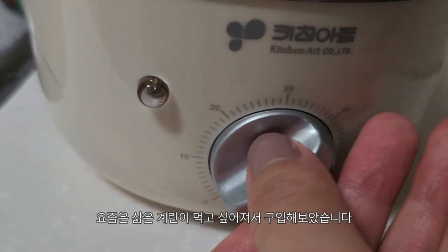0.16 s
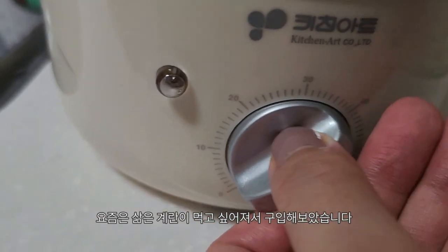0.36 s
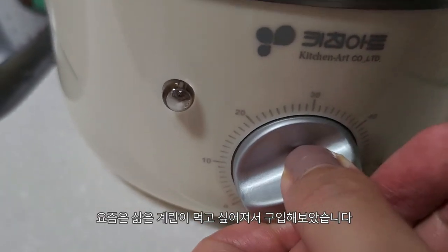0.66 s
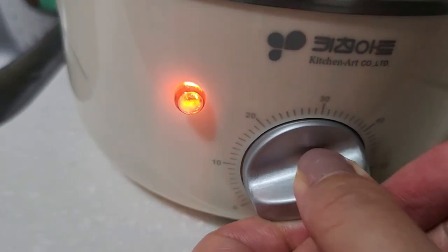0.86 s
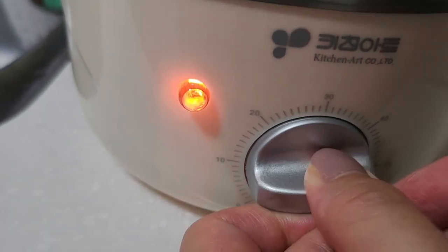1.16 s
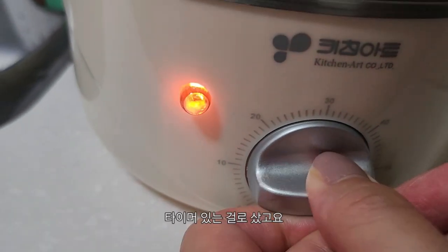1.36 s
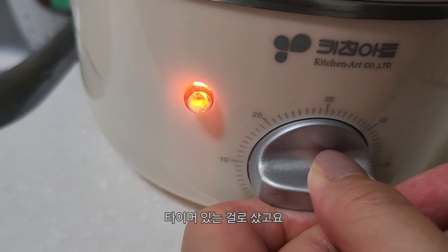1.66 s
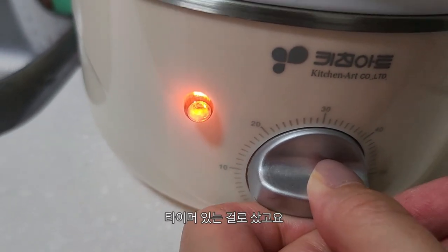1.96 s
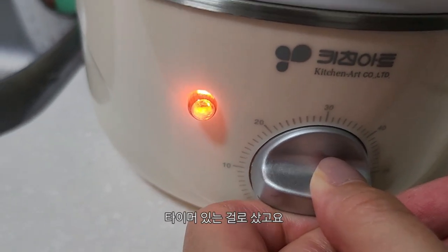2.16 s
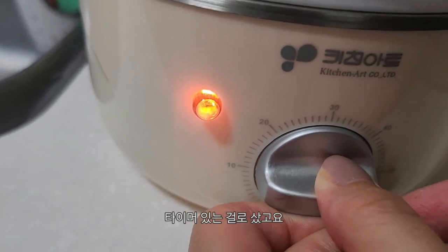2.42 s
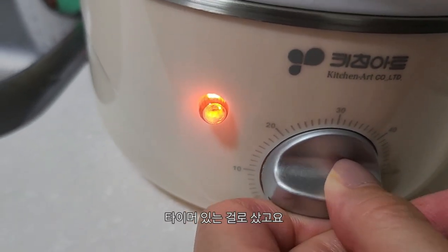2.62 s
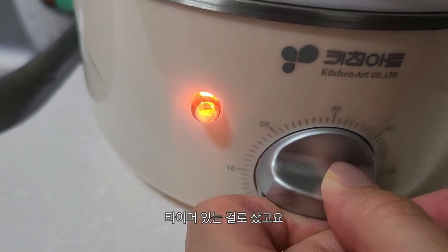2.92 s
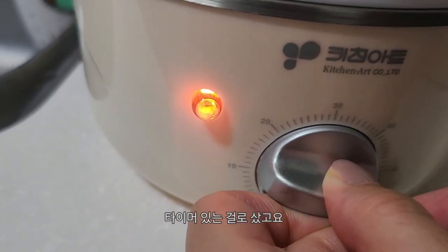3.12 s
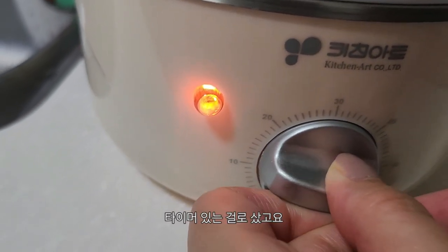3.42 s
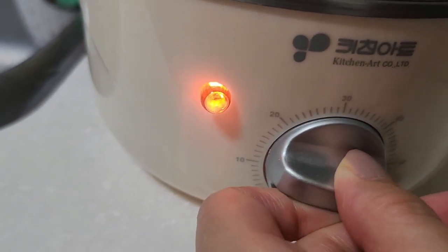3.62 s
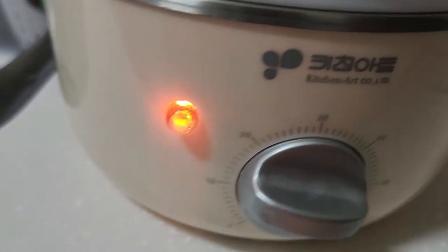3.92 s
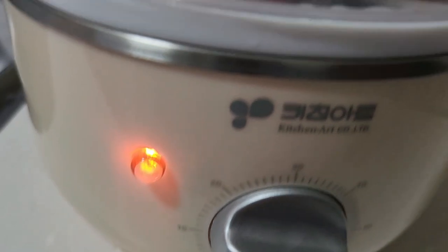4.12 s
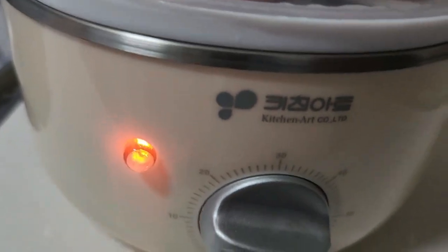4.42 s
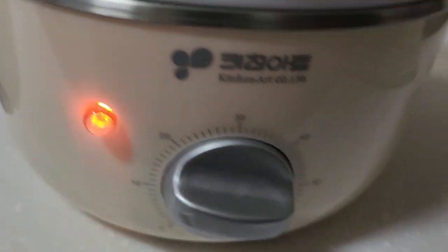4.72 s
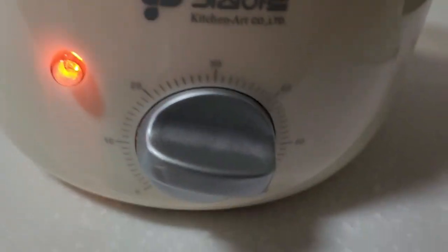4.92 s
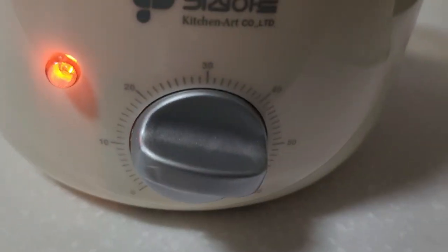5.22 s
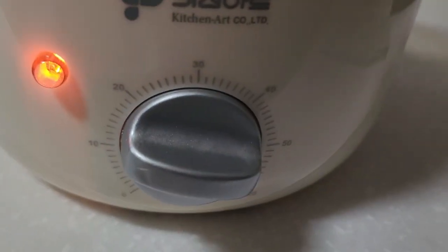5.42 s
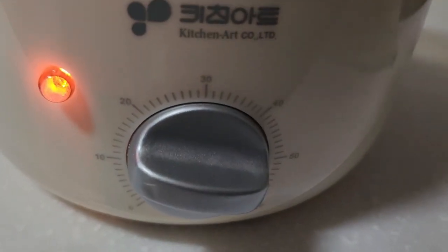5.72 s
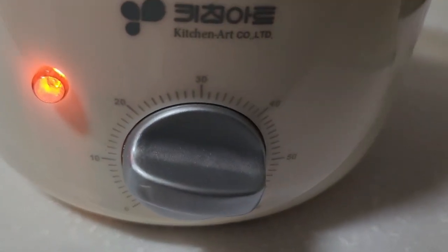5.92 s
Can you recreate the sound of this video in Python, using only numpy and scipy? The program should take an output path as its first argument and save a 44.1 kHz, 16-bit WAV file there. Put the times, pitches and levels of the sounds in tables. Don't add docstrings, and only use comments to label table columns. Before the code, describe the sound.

A handheld stereo microphone sits very near a spring timer. After faint skin brushing and a tiny squeak, the ratchet snaps rapidly, bright and metallic with a boxy boom from the hollow plastic shell. Smaller groups of clicks follow between quiet gaps. Then thin, regular ticks continue alone over low fridge hum and soft hiss, with a rub on the left side, small squeaks and dull handling bumps.

```python
import sys
import numpy as np
from scipy import signal
from scipy.io import wavfile

SR = 44100
rng = np.random.default_rng(int(sys.argv[2]) if len(sys.argv) > 2 else 0)


def dump(signal):
    limited = np.clip(np.atleast_2d(signal).T, -1, 1)
    pcm = np.round(limited * 32767).astype(np.int16)
    wavfile.write(sys.argv[1], SR, pcm)


def makeup_ratio(level_db):
    decades = np.asarray(level_db, float) / 20
    return 10 ** decades


N = 267687

# pitch in Hz, level in dB.
HUM = [(59.2, -67.5), (118.4, -68.5), (236.9, -81.5), (376.8, -84), (473.7, -80.5), (538.3, -87.5)]
# pitch in Hz, width in Hz, level in dB.
FAN_TONES = [(466.7, 48, -7.5), (1884, 21, -1.5), (2080, 31, -5.5), (2880, 67, -6), (3396, 24, -2.5),
             (4394, 61, -5), (6890, 45, -10), (7480, 120, -15.5), (8020, 110, -17), (8720, 60, -14.5),
             (8900, 22, -21.5), (10410, 55, -20)]
# time in seconds, level in dB.
AIR = [(0, -62.5), (.6, -63.5), (2.2, -64), (3.3, -62.5), (3.7, -61), (4.4, -61.5), (5, -62), (5.6, -59),
       (6.07, -57.5)]
# pitch in Hz, left minus right in dB.
AIR_BALANCE = [(60, -5), (110, -4.5), (200, 0.5), (380, -10.5), (700, 3.5), (1290, 9), (2380, -11.5),
               (4400, -8), (8120, 0), (15000, 3)]
# pitch in Hz, likeness from 0 to 1.
LIKENESS = [(60, 0.67), (250, 0.83), (700, 0.082), (2000, 0.2), (6000, 0.067), (15000, 0.11)]
# pitch in Hz, level in dB per Hz.
RUMBLE = [(15, -53), (25, -16), (44, -11), (118, -3.5), (150, -10.5), (187, -11.5), (244, -11.5),
          (286, -23.5), (475, -27.5), (506, -21.5), (1100, -41), (1430, -70), (2420, -120)]
# pitch in Hz, level in dB per Hz.
HISS = [(1100, -54), (1500, -36), (1850, 1.5), (2600, -7), (3200, -19), (3900, -22.5), (4500, -10),
        (5500, -22.5), (7000, -15), (9000, -23), (10500, -20), (12500, -13.5), (14500, -17.5), (16500, -19)]
HISS_DB, HISS_RISE_DB_PER_S, HISS_FOLLOWS = -69, .5, -.3

# loudest moment in seconds, level in dB, swell in seconds,
# dull share in dB.
STROKES = [
    (.184, -71, 0.012, -11),
    (0.256, -72, .012, 9),
    (4.6, -65, 0.013, -10),
    (4.645, -63, 0.11, -11),
    (4.698, -46.5, 0.15, 0),
    (4.99, -62.5, 0.22, -4.5),
]
SWELL_DB, STROKE_FADE_DB_PER_S = 40.5, 602
# start in seconds, level in dB, start pitch in Hz, end pitch in Hz,
# length in seconds.
SQUEAKS = [
    (0.231, -45, 3150, 3000, 0.0092),
    (0.241, -46, 3040, 3010, 0.013),
    (3.824, -55, 2890, 2770, 0.023),
    (3.837, -55.5, 2230, 2130, 0.032),
    (4.888, -47.5, 2910, 2960, 0.011),
    (4.9, -52, 2610, 2600, 0.019),
]

# time in seconds, strength in dB, bright part in dB, dull part in dB.
TOUCHES = [(.441, -59, -20, 8.5), (.501, -49, -19, 0), (.5245, -36.5, -19, -5), (1.488, -36.5, -18, -8),
           (1.741, -38, -12, 5), (2.952, -47, -10, 4.5), (3.095, -46, -30, -5), (3.458, -38, -12, -19),
           (3.900, -50, -9, 2), (4.456, -47, -11, -8), (4.135, -52, -22, -10), (4.844, -54.5, 0, -12),
           (5.561, -45, -7, -8)]
# time in seconds, strength in dB, bright part in dB, dull part in dB.
TICKS = [(2.0587, -37, -22, -6.5), (2.3049, -28.5, -8.5, -3), (3.674, -42, -3, -5.5),
         (3.9415, -32, -16.5, -8), (4.2115, -33.5, -5.5, -9.5), (4.4838, -32.5, -14, -10.5),
         (4.7589, -30, -10, -12.5), (5.0319, -34.5, -13, -6), (5.3106, -31, -8, -14.5),
         (5.5835, -34.5, -11.5, -6), (5.8639, -29, -7, -9)]
# pitch in Hz, width in Hz, level in dB.
ESCAPEMENT = [(2120, 300, -3), (2600, 120, -24), (3570, 170, -15), (4080, 320, -2.5), (4860, 210, -5),
              (5400, 990, -31), (7800, 870, 3), (8630, 140, -4.5), (11400, 290, -3)]
# delay in seconds, level in dB.
TICK_CONTACTS = [(0, -2.5), (.0008, -3), (.0035, -5.5), (.006, -4)]

# time in seconds, strength
# in dB.
PAWL_DROPS = [(0.5338, -35), (0.5378, -24), (0.5439, -19), (0.6316, -20), (0.6795, -22.5), (0.6866, -25.5),
              (0.6959, -22.5), (0.7093, -21), (0.7199, -21), (0.7347, -21.5), (0.7453, -21), (0.7567, -24),
              (0.8139, -19.5), (0.8355, -20.5), (0.8512, -21.5), (0.8631, -21.5), (0.8731, -23),
              (0.8873, -21), (0.9174, -22.5), (0.9306, -22.5), (0.945, -19.5), (0.9644, -22), (0.98, -19),
              (0.9915, -20.5), (1.0043, -26), (1.0133, -20.5), (1.0572, -23), (1.0793, -21.5),
              (1.089, -20), (1.1439, -19.5),
              (1.3839, -23), (1.3951, -21.5), (1.4094, -19), (1.4287, -19), (1.5704, -21), (1.5883, -18.5),
          (1.6094, -21.5), (1.698, -20.5), (1.7536, -21.5), (1.7715, -22), (1.781, -20.5), (1.7942, -21.5),
          (1.8145, -21), (1.908, -23), (1.9317, -23), (1.9544, -23.5),
              (2.6602, -24), (2.733, -26), (2.7498, -23), (2.7655, -24), (2.798, -21), (2.8328, -20),
               (2.8692, -24.5), (2.8781, -22), (3.1099, -24), (3.3208, -24), (3.3335, -21), (3.3464, -21.5),
               (3.3583, -21.5), (3.4649, -27), (3.4704, -28.5), (3.4788, -29.5)]
# first tooth in seconds, last tooth in seconds,
# first level in dB, last level in dB.
SLIPS = [
    (1.0956, 1.1331, -17, -18),
    (2.8411, 2.858, -20.5, -23),
]
SLIP_GAP_S = .0045
SKIM_DB, TOOTH_SPREAD_DB = -4, 1.5
# time in seconds, bright part in dB,
# dull part in dB, shell boom in dB.
GRIP = [(.4, -7.5, -4.5, 7.5), (.59, -10, -7.5, -6), (.655, -4.5, -3, 7), (.785, -5, -6, 3.5),
        (.902, -5, -4.5, 4.5), (1.035, -7, -4, 2.5), (1.26, -8.5, -6, 4.5), (1.5, -9.5, -6.5, 0),
        (1.655, -12, -7, -2), (1.725, -7.5, -6, 5), (1.86, -7, -5, 0.5), (2.3, -10, -5, 0),
        (2.815, -6, -4, 7), (3.0, -8, -5, -4), (3.2, -9.5, -8, 3.5), (3.41, -11.5, -5, 8.5)]
# delay in seconds, level in dB.
SNAP_CONTACTS = [(-.0035, -19), (-.0016, -24), (0, -7), (.0006, 1.5), (.0012, 1), (.004, -21)]
# pitch in Hz, width in Hz, level in dB.
CRACK = [(2180, 1130, -16), (2600, 280, 0), (3670, 220, -2), (4363, 313, 3), (4710, 500, 3.5),
         (6560, 760, -39), (12300, 1100, -45.5)]
# pitch in Hz, width in Hz, level in dB.
MOVEMENT = [(645.5, 30, -16), (943, 45, -11), (1689, 71, -5.5), (1774, 113, -3), (2140, 200, 7.5),
            (2113, 83, 3.5), (2456, 180, -4.5), (2585, 30, -1.5), (2650, 150, -18), (3110, 23, -21),
            (3630, 60, -4), (3790, 70, 1), (4040, 39, -2), (4382, 63, 0), (4870, 59, -26), (5250, 77, -2),
            (5800, 130, -41), (7260, 270, 4.5)]
# pitch in Hz, width in Hz, level in dB.
HOUSING = [(244.6, 25, -1.5), (252.4, 14, -8.5), (410, 38, -10), (445, 32, -8.5)]
# pitch in Hz, level in dB per Hz.
RATTLE = [(180, -42), (300, -10.5), (447, -11.5), (528, -33.5), (961, -7.5), (1100, -31), (1610, -5),
          (2280, 4), (2520, -18), (3080, -2.5), (4370, -4.5), (5520, -3), (9880, -10.5), (12100, -4.5),
          (16000, -6.5)]
# pitch in Hz, time in seconds.
RATTLE_T60 = [(200, 0.23), (1000, 0.071), (4000, 0.051), (15000, 0.011)]
# pitch in Hz, time in seconds.
ROOM_T60 = [(200, 0.92), (1000, 0.19), (4000, 0.23), (15000, 0.065)]
# pitch in Hz, left minus right in dB.
SNAP_BALANCE = [(200, 0.5), (900, 9.5), (2050, 7), (2500, -9), (3400, -4.5), (4300, -5.5), (5400, 3),
                (9000, 2.5)]
# pitch in Hz, lead in radians.
SNAP_PHASE = [(600, 0), (1150, 2.4), (1450, 0), (2200, 0), (2800, 2.9), (4000, 1.7), (4400, -1),
              (7000, -1.4)]
RISE_S, CASE_RING_S = .004, .07
THIN_TICK_DB = -14

# time in seconds, level in dB, pitch in Hz.
BUMPS = [
    (3.831, -62, 106),
    (4.159, -50.5, 109),
    (4.655, -51, 68),
    (4.881, -54, 117),
    (5.004, -47.5, 130),
    (5.84, -52, 64),
    (6.004, -53, 80.5),
]


def rms_one(x):
    return x / np.sqrt(np.mean(x ** 2) + 1e-20)


def in_time(rows):
    s, *columns = np.transpose(rows)
    return [np.interp(np.arange(N) / SR, s, c) for c in columns]


def at_hz(points, hz):
    table_hz, values = np.transpose(points)
    return np.interp(np.log(hz), np.log(table_hz), values)


def drift(rate):
    r = np.exp(-80 * np.pi * rate / SR)
    slow = signal.lfilter([1], [1, -2 * r, r * r], rng.standard_normal(N // 40 + 2002))[2000:]
    return np.interp(np.arange(N) / 40, np.arange(len(slow)), rms_one(slow))


def sides(balance_db):
    return makeup_ratio(balance_db * np.array([[.5], [-.5]]))


def fade(x, t60, hz=0):
    turn = np.exp(2j * np.pi * hz / SR) if hz else 1
    return signal.lfilter([1], [1, -makeup_ratio(-60 / (t60 * SR)) * turn], x + 1e-18)


def filtered(x, order, edge_hz, kind):
    return signal.sosfilt(signal.butter(order, edge_hz, kind, fs=SR, output="sos"), x)


def noise_bands():
    white = rng.standard_normal((2, 2, N))
    edges = np.geomspace(30, 16800, 25)
    for k, (low, high) in enumerate(zip(edges, edges[1:])):
        mid, side = filtered(white[k % 2], 2, [low, high], "band")
        hz = np.sqrt(low * high)
        alike = np.clip(at_hz(LIKENESS, hz), -1, 1)
        yield hz, np.sqrt(1 + alike) * mid + np.sqrt(1 - alike) * side * [[1], [-1]]


def strength_db(events, hz):
    s, level_db, bright_db, dull_db = np.transpose([row[:4] for row in events])
    return level_db + (bright_db + 8) * (hz > 5500) + (dull_db + 5) * (hz < 2900)


def train(events, gains, late_s=0):
    clicks = np.zeros(N)
    times = np.array([row[0] for row in events]) + late_s
    clicks[(times * SR).astype(int)] = gains
    return clicks


def struck(events, modes, contacts, longest_s, spread_db):
    luck = rng.standard_normal((len(events), len(modes) + 1, len(contacts)))
    late_s, contact_db = np.transpose(contacts)
    times = np.array([[row[0]] for row in events]) + late_s * (1 + .25 * luck[:, -1])
    at = (times * SR).astype(int)
    shares = makeup_ratio(spread_db * luck[:, :-1])
    weight = makeup_ratio(np.add.outer(np.array(modes)[:, 2], contact_db))
    shares *= weight * np.linalg.norm(weight) / np.linalg.norm(shares * weight, axis=(1, 2), keepdims=True)
    out = np.zeros((2, N))
    for k, (hz, width_hz, level_db) in enumerate(modes):
        clicks = np.zeros(N)
        np.add.at(clicks, at, makeup_ratio(strength_db(events, hz))[:, None] * shares[:, k])
        ring = fade(clicks, min(2.2 / width_hz, longest_s), hz)
        port_phase = [[0], [at_hz(SNAP_PHASE, hz)]]
        turn = 0.46 * rng.standard_normal((2, 1)) + np.pi * k + port_phase
        gain = sides(at_hz(SNAP_BALANCE, hz))
        out += gain * np.cos(turn) * ring.imag + gain * np.sin(turn) * ring.real
    return out


def fridge():
    t = np.arange(N) / SR
    rumble_db, = in_time(AIR)
    out = np.zeros((2, N))
    for hz, db in HUM:
        level = makeup_ratio(db + 1.5 * drift(2))
        tone = level * np.sin(2 * np.pi * hz * t + 0.84 * drift(2.8))
        out += sides(at_hz(AIR_BALANCE, hz)) * tone
    out *= makeup_ratio(rumble_db - rumble_db.mean())
    wind = rng.standard_normal(N)
    for hz, width_hz, db in FAN_TONES:
        whistle = rms_one(fade(wind, 1.3 / width_hz, hz).imag)
        tone = makeup_ratio(db - 89) * np.sqrt(width_hz) * whistle
        out += [tone, np.roll(tone, SR)]
    return out


def kitchen_air(hz, together):
    rumble_db, = in_time(AIR)
    if hz < 1100:
        steady_db = rumble_db + at_hz(RUMBLE, hz) + 11.0
    else:
        hiss_db = HISS_DB + HISS_RISE_DB_PER_S * np.arange(N) / SR
        hiss_db = hiss_db + HISS_FOLLOWS * (rumble_db - rumble_db.mean())
        steady_db = hiss_db + at_hz(HISS, hz)
    patchy_db = 3.0 * (0.4 * together + drift(14.6))
    return makeup_ratio(steady_db + 7.5 + patchy_db) * sides(at_hz(AIR_BALANCE, hz))


def air_and_rattle(teeth):
    together = drift(4.2)
    blow_count = len(teeth + TICKS + TOUCHES)
    luck_db = 2.0 * rng.standard_normal((blow_count, 24))
    out = np.zeros((2, N))
    for k, (hz, band) in enumerate(noise_bands()):
        if hz > 300:
            out += band * rattle(teeth, hz, luck_db[:, k])
            band = np.roll(band, SR, axis=1)
        out += band * kitchen_air(hz, together)
    return out


def brushes():
    t, out = np.arange(N) / SR, np.zeros((2, N))
    grain = rng.standard_normal(N) * makeup_ratio(0.89 * drift(140))
    bright = rms_one(filtered(grain, 2, [11000, 16100], "band"))
    bright = bright + makeup_ratio(-3) * rms_one(filtered(grain, 2, [5400, 7500], "band"))
    dull = rms_one(filtered(grain, 2, [1950, 3800], "band"))
    for s, db, swell_s, dull_db in STROKES:
        below_db = np.where(t < s, SWELL_DB * (s - t) / swell_s, STROKE_FADE_DB_PER_S * (t - s))
        stroke = makeup_ratio(db - below_db + 5.0) * (bright + makeup_ratio(dull_db) * dull)
        out += stroke * makeup_ratio(np.array([[0], [-25]]))
    return out


def squeaks():
    out, t, rough = np.zeros((2, N)), np.arange(SR // 10) / SR, drift(120)
    other_rough = np.roll(rough, SR)
    for s, db, start_hz, end_hz, length in SQUEAKS:
        age = t / length
        span = slice(int(s * SR), int(s * SR) + len(t))
        pitch = end_hz + (start_hz - end_hz) * np.exp(-1.5 * age)
        phase = 2 * np.pi * np.cumsum(pitch) / SR + 0.99 * other_rough[span]
        flutter = 1 + .8 * rough[span]
        swell = np.tanh(15 * age) * np.exp(-age ** 2)
        out[:, span] += makeup_ratio(db) * flutter * swell * np.sin(phase + [[0], [2]])
    return out


def escapement():
    ticks = struck(TICKS + TOUCHES, ESCAPEMENT, TICK_CONTACTS, longest_s=.03, spread_db=-1.5)
    return filtered(makeup_ratio(-11) * ticks, 2, 1700, "high")


def rattle(teeth, hz, luck_db):
    events = teeth + TICKS + TOUCHES
    is_tick = np.arange(len(events)) >= len(teeth)
    tick_db = -4 + THIN_TICK_DB * (hz < 1500)
    blow_db = strength_db(events, hz) + tick_db * is_tick + luck_db + at_hz(RATTLE, hz)
    blows = train(events, makeup_ratio(2 * blow_db))
    blows = fade(blows, RISE_S) / (RISE_S * SR / np.log(1000))
    ringing = makeup_ratio(2 * -4.5) * fade(blows, at_hz(RATTLE_T60, hz) / 2)
    ringing += makeup_ratio(2 * -20.5) * fade(blows, at_hz(ROOM_T60, hz) / 2)
    flip = np.array([[1], [np.sign(np.cos(at_hz(SNAP_PHASE, hz)))]])
    return flip * np.sqrt(ringing * sides(2 * at_hz(SNAP_BALANCE, hz)))


def pawl():
    teeth = PAWL_DROPS
    for first_s, last_s, first_db, last_db in SLIPS:
        count = round((last_s - first_s) / SLIP_GAP_S) + 1
        times = np.linspace(first_s, last_s, count)
        levels_db = np.linspace(first_db, last_db, count) + SKIM_DB * (np.arange(count) % 2)
        teeth = teeth + list(zip(times, levels_db))
    grip = np.array(GRIP)
    held = np.searchsorted(grip[:, 0], np.array(teeth)[:, 0]) - 1
    colour_db = grip[held, 1:]
    colour_db = colour_db + TOOTH_SPREAD_DB * rng.standard_normal(colour_db.shape)
    return np.c_[teeth, colour_db].tolist()


def snap_crack(teeth):
    crack = struck(teeth, CRACK, SNAP_CONTACTS, longest_s=.02, spread_db=1.5)
    return filtered(makeup_ratio(-5) * crack, 2, 1300, "high")


def case_ring(teeth):
    return makeup_ratio(-20.0) * struck(teeth, MOVEMENT, SNAP_CONTACTS, longest_s=CASE_RING_S, spread_db=1.5)


def shell(teeth):
    s, level_db, bright_db, dull_db, boom_db = np.transpose(teeth)
    push = train(teeth, makeup_ratio(level_db + boom_db), late_s=0.00388)
    out = np.zeros((2, N))
    for hz, width_hz, db in HOUSING:
        frame = fade(push, 2.96 / width_hz, hz)
        swell = fade(frame, 0.036, hz).imag * 2 * np.log(10) / (0.054 * SR)
        out += makeup_ratio(db) * sides(at_hz(SNAP_BALANCE, hz)) * swell
    return makeup_ratio(-21.0) * out


def bumps():
    out, t = np.zeros((2, N)), np.arange(SR // 10) / SR
    for s, db, hz in BUMPS:
        swell = t * hz * np.exp(1 - 1.07 * t * hz)
        thud = makeup_ratio(db - 7.0) * swell * np.sin(2 * np.pi * hz * t) * sides(-17)
        at = int(s * SR)
        out[:, at:at + len(t)] += thud[:, :N - at]
    return out


def scene():
    teeth = pawl()
    timer = snap_crack(teeth) + case_ring(teeth) + shell(teeth) + escapement()
    noise = air_and_rattle(teeth) + brushes()
    noise = signal.sosfilt(signal.cheby2(8, 30, 15850, fs=SR, output="sos"), noise)
    return timer + noise + fridge() + bumps() + squeaks()


def low_pass(x):
    return signal.sosfilt(signal.butter(12, 16810, fs=SR, output="sos"), x)


def record(dry):
    rounded = .4 * np.tanh(dry / .4)
    mix = signal.sosfilt(signal.cheby2(10, 60, 16900, fs=SR, output="sos"), rounded)
    return low_pass(mix)


dry = scene()
out = record(dry)
dump(out)
```